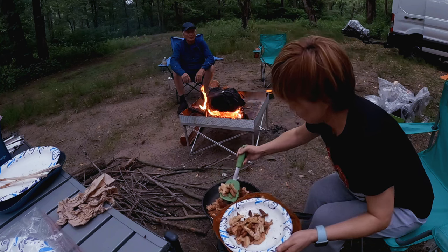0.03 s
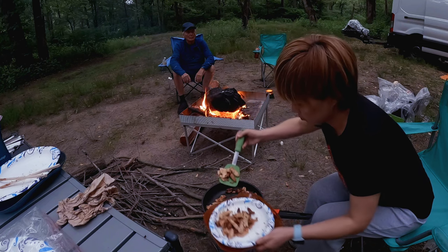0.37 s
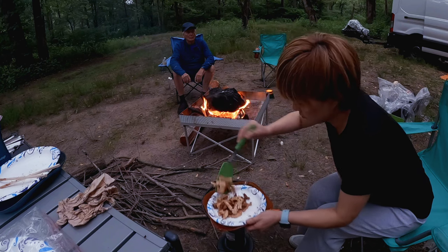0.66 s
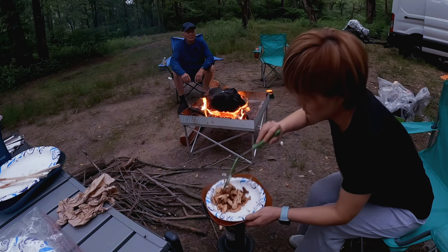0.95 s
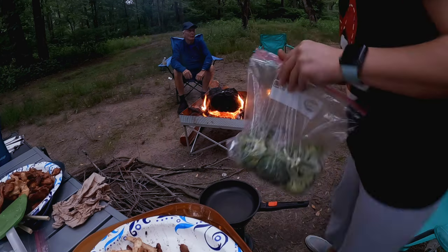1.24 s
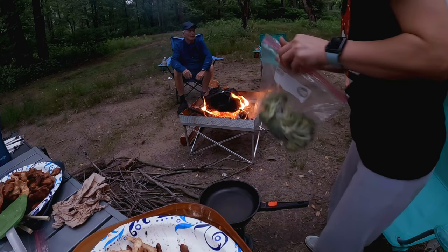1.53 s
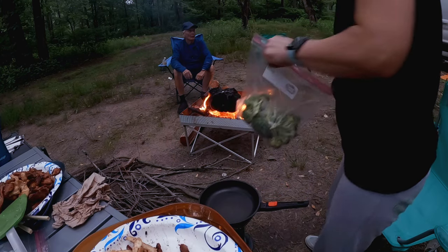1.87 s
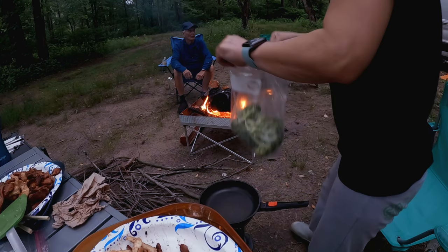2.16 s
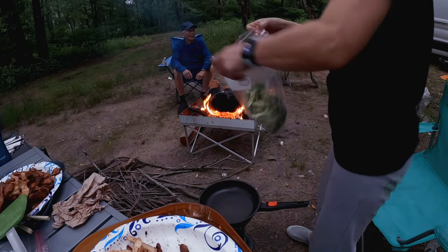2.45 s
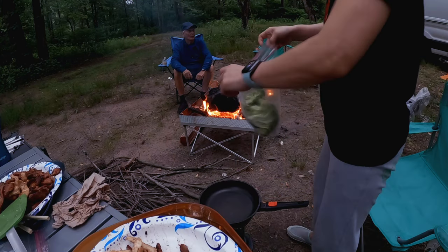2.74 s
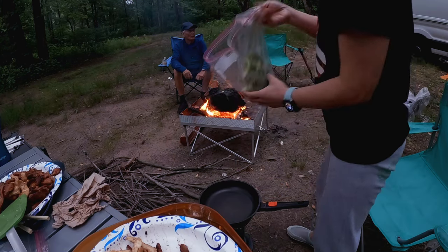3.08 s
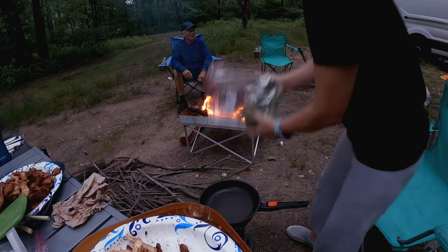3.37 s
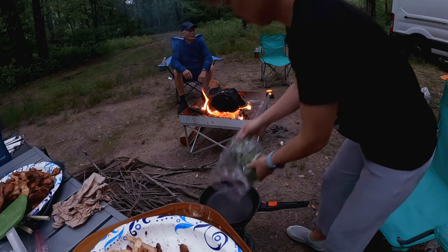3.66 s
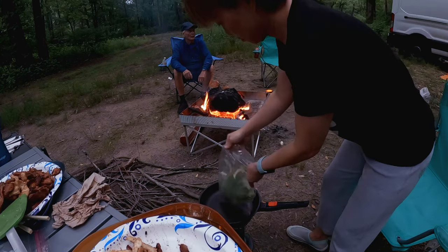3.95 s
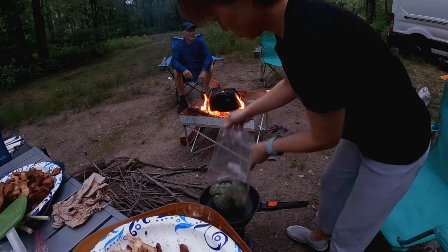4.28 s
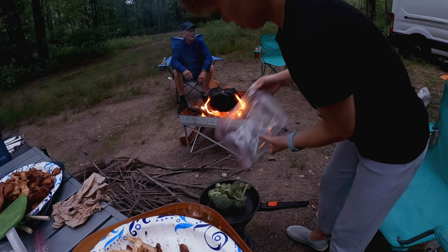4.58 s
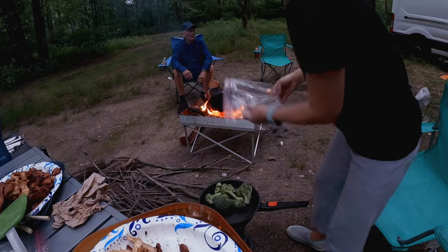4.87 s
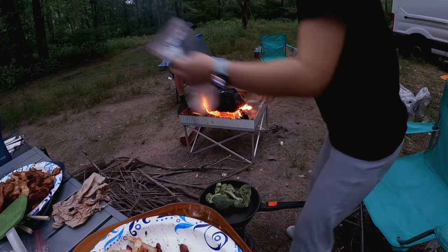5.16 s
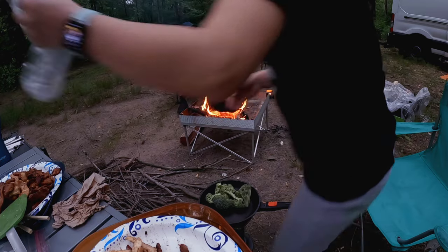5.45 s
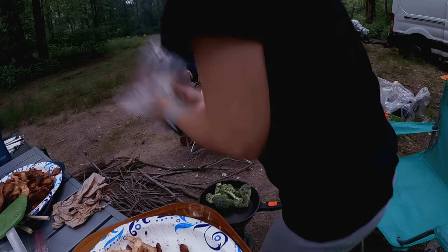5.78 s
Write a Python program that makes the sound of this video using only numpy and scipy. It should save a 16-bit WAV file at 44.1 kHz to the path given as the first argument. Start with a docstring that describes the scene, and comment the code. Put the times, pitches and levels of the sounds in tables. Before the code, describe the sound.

Over a softly whistling camp stove, frying stops, a zip bag is shaken and opened, and vegetables thud into a skillet and sizzle.

```python
"""A gas burner roars under a campsite skillet, and cavity resonances below the pan make its noise sing.
Steam bubbles bursting in hot fat give the sizzle of meat, which fades, then stops abruptly.
A plastic bag is shaken, unzipped and emptied, its film buckling in clicks; vegetables strike the pan,
exciting its modes, and the sizzle returns. Further off a wood fire ticks, and the swung bag sends
low puffs of air against the microphone."""
import sys
import numpy as np
from scipy import signal
from scipy.fft import rfft, irfft, next_fast_len
from scipy.io import wavfile
from scipy.ndimage import map_coordinates

SR = 44100
rng = np.random.default_rng(int(sys.argv[2]) if len(sys.argv) > 2 else 0)


def materialize(psi):
    """Save the field psi as 16-bit PCM at rate SR to the path in sys.argv[1].

    A 1-D psi becomes a single channel; in a 2-D psi each row is a channel.
    """
    bounded = np.clip(np.atleast_2d(psi).T, -1, 1)
    quanta = np.round(bounded * 32767).astype(np.int16)
    wavfile.write(sys.argv[1], SR, quanta)


N = 256662
TIME = np.arange(N) / SR

# envelope of the flame's singing band: t/s, level/dB
SONG_ENVELOPE = [(0, -46.6), (0.4, -51.9), (0.62, -49.3), (0.85, -41.7), (1.3, -36.1), (1.8, -37.6),
                 (2.22, -40.3), (2.45, -44.4), (3.0, -49.3), (3.48, -47.0), (3.7, -43.4), (4.2, -36.4),
                 (4.9, -40.7), (5.45, -45.3), (5.82, -45.0)]
# resonances of the cavity between burner and pan: f/Hz, half-width/Hz, level/dB
CAVITY_MODES = [(1284, 180, -10.5), (2266, 98, -2), (2448, 110, 1.5), (2800, 76, -13), (3550, 350, -21.5)]
# spectra of the roar, hot fat, crinkling film, dull handling, draught and eddies: f/Hz, level/dB
ROAR_SPECTRUM = [(20, -35), (50, -16), (110, -5.5), (175, 3.5), (250, -3), (420, -11), (640, -10.5),
                 (850, -12), (1300, -3.5), (2500, -8.5), (4500, -14), (6800, -22), (8500, -33.5),
                 (13000, -46), (16000, -57)]
FAT_SPECTRUM = [(300, -26), (900, -7), (1500, -3.5), (3000, -0.5), (4500, 0.5), (6800, -2.5), (8300, -12),
                (12500, -16), (15500, -33)]
FILM_SPECTRUM = [(80, -17), (600, -14.5), (1100, -4.5), (2000, -0.5), (3200, 2), (4800, -3), (6800, -8.5),
                 (8500, -22), (12500, -30.5), (15800, -48)]
HANDLING_SPECTRUM = [(25, -9), (80, 2), (250, 5), (600, 0.5), (1050, 3.5), (1800, -3), (4000, -52)]
DRAUGHT_SPECTRUM = [(15, 5), (35, -2), (80, -2.5), (150, -14), (400, -17.5), (1000, -42)]
EDDY_SPECTRUM = [(40, -5), (80, 1), (125, -11), (200, 4), (300, -10), (430, -12.5), (1100, -40.5)]
# drops of fat spitting: t/s, level/dB
FAT_SPITS = [(0.1378, -18), (0.242, -23), (0.3834, -24), (0.4614, -26), (0.602, -29), (0.72, -20),
             (0.9068, -26.5), (0.9884, -27), (1.284, -24), (4.4124, -18), (4.4188, -14), (4.6774, -20),
             (4.728, -15)]
# grips, tugs and shakes of the bag: peak t/s, crinkle level/dB, rub level/dB, rise/s, fall/s
BAG_GRIPS = [(1.952, -26, -28.5, .024, .02), (2.05, -33.5, -36, .075, .07), (2.143, -37, -33, .035, .018),
             (2.385, -38, -42, .04, .035), (2.5, -45, -57, .04, .08), (2.688, -33, -35.5, .085, .1),
             (2.832, -34.5, -31.5, .018, .042), (2.93, -46, -52, .06, .09), (3.087, -43, -42.5, .016, .018),
             (3.178, -32, -39.5, .047, .035), (3.31, -44, -50, .02, .02), (3.396, -37, -37.5, .035, .04),
             (3.55, -45, -52, .04, .025), (3.685, -40, -49, .025, .07), (3.82, -39, -45, .022, .2),
             (4.003, -33, -42, .018, .07), (4.09, -36, -37, .045, .07), (5.66, -48, -49, .08, .1),
             (5.82, -36, -58, .02, .03)]
# loud single creases buckling: t/s, level/dB, treble shelf/dB
LOUD_CREASES = [(1.918, -11.5, -10), (1.9225, -7.5, 4), (1.9423, -8, -8), (1.9468, -6, -4),
                (1.9519, -5, -10), (1.984, -14, 2), (1.9942, -10, -8), (2.0111, -11, 12), (2.0344, -11, -9),
                (2.0442, -8.5, 4), (2.0639, -7, 5), (2.0784, -17, 14), (2.117, -13, 3), (2.143, -10, 6),
                (2.2227, -21, 5), (2.5402, -17.5, -6), (2.592, -15, 7), (2.6438, -13.5, 14),
                (2.6603, -13, 16), (2.6907, -12, 20), (2.8513, -9, -5), (2.971, -23, 9), (3.0711, -23, 0),
                (3.0876, -21, 20), (3.111, -24, 0), (3.1934, -17, 22), (3.2256, -19, 18), (3.549, -17, 6),
                (3.6785, -18, 9), (3.7562, -21, 6), (3.8128, -17, -10), (3.902, -20, 14),
                (4.8177, -9.5, 15), (4.9842, -13.5, 18), (5.034, -13.5, -10), (5.1732, -17.5, 7),
                (5.5771, -13.5, 5), (5.635, -9.5, 32), (5.666, -10, 15), (5.7364, -12, 28)]
# the zip seal popping apart: t/s, level/dB, ring f/Hz
SEAL_POPS = [(2.3113, -11, 4250), (2.337, -7.5, 4270), (2.3418, -20, 3440), (2.353, -18, 4130),
             (2.3545, -12, 4100), (2.569, -11, 2750)]
# spectrum of the seal's crack: f/Hz, level/dB
SEAL_SPECTRUM = [(500, -17.5), (1600, -10), (3000, 0), (5200, -4.5), (8000, -21), (15000, -41)]
# vegetables landing: t/s, level/dB
VEG_LANDINGS = [(4.029, -24.5), (4.052, -29), (4.071, -39), (4.087, -25)]
# normal modes of the skillet: f/Hz, level/dB, T60/s
SKILLET_MODES = [(680, -13, 0.092), (783, -5, 0.21), (992, -6, 0.069), (1140, -10, 0.09), (1450, 1.5, 0.18),
                 (1868, -10, 0.17), (3050, -21, .13), (3500, -19, 0.15), (3820, -15, .11)]
# puffs from the swung bag: peak t/s, draught level/dB, eddy level/dB, rise/s, fall/s
AIR_PUFFS = [(4.753, -37, -24.5, .005, .022), (4.785, -27.5, -48, .015, .07), (5.25, -39.5, -65, .06, .25),
             (5.72, -46, -33, .012, .035)]
# burning wood popping: t/s, level/dB
WOOD_POPS = [(1.3618, -39), (1.5543, -26.5), (1.6132, -28), (1.7185, -33), (1.8097, -41), (1.8616, -31)]
# left-right likeness of the stove's noise: f/Hz, coherence
STOVE_COHERENCE = [(200, 0.97), (640, 0.84), (1400, 0.53), (3100, 0.43), (7000, 1), (15000, 0)]
# colour of the two microphone ports: f/Hz, left minus right level/dB
PORT_BALANCE = [(400, -0.1), (1200, 0), (2400, 1.5), (4400, -1.8), (8500, 0.5), (13000, -4.5)]


def burner():
    """Cavity resonance: the gap under the pan filters the flame's noise into a song above its roar."""
    def cavity_gain(hz):
        peaks = (amp(db) / (1 + ((hz - centre) / width) ** 2) for centre, width, db in CAVITY_MODES)
        return np.sqrt(sum(peak ** 2 for peak in peaks))

    roar = stereo_noise(lambda hz: amp(along(ROAR_SPECTRUM, hz))) * amp(-45 + 0.62 * wobble(11))
    rumble = stereo_noise(lambda hz: 1 / (1 + (hz / 80) ** 4)) * amp(-63 + 4 * wobble(14))
    # as the flame flutters, up to half the song's power locks into a trill of rising chirps
    locked = .5 * np.exp(-((TIME - 4.1) / .33) ** 2)
    chirps_per_s = 32
    cycle = (chirps_per_s * TIME + .07 * wobble(8)) % 1
    pitch_hz = 2400 + 420 * (cycle - .5) + 45 * wobble(120)
    trill = unit(np.sin(np.pi * cycle) ** 2 * np.sin(2 * np.pi * np.cumsum(pitch_hz) / SR))
    envelope = amp(np.interp(TIME, *np.transpose(SONG_ENVELOPE)) + 2.4)
    song = (np.sqrt(1 - locked) * stereo_noise(cavity_gain) + np.sqrt(locked) * trill) * envelope
    return roar + rumble + song * amp([[2.5], [-3.5]])  # the song lies to the left


def sizzle():
    """Boiling follows heat: crisp meat cools, duller wet vegetables warm and settle, and drops spit."""
    cooling_db_per_s, stop_s = 5.2, 1.305
    gate = np.clip((stop_s - TIME) / .01 + 1, 0, 1)
    meat = amp(-45.6 - cooling_db_per_s * TIME) * gate
    vegetables = amp(-43.7) * swell(peak_s=4.7, rise_s=.75, fall_s=3)
    spits = np.zeros(N)
    for s, db in FAT_SPITS:
        add(spits, s + .001, amp(db - 1.5) * click(FAT_SPECTRUM, t60=0.012, flutter=0.41))
    food = frying(meat, treble_db=2) + frying(vegetables, treble_db=-4.5)
    return food + scattered(spits, wet_db=-4, t60=.04)


def frying(heat, treble_db):
    """Shot noise: tiny steam bubbles burst independently in hot fat, over a fine hiss."""
    spectrum = treble_shelf(FAT_SPECTRUM, treble_db)
    bubbles = crackle(spectrum, per_s=900, spread_db=10, t60=0.0012) * heat * amp(2.5)
    hiss = stereo_noise(lambda hz: amp(along(spectrum, hz))) * heat * amp(0.5)
    return scattered(bubbles, wet_db=-3, t60=0.047) + hiss


def bag():
    """Buckling: plastic film snaps in swarms of creases and single loud ones, over its load's dull rub."""
    crinkle, rub = swells(BAG_GRIPS)
    film = crackle(FILM_SPECTRUM, per_s=2000, spread_db=5, t60=0.0074, shapes=24) * crinkle * amp(1.5)
    film += crackle(HANDLING_SPECTRUM, per_s=2500, spread_db=4.5, t60=0.0064) * rub * amp(0.3)
    creases = crackle(FAT_SPECTRUM, per_s=160, spread_db=4, t60=0.005) * crinkle * amp(-6.5)
    for s, db, treble_db in LOUD_CREASES:
        spectrum = treble_shelf(FILM_SPECTRUM, treble_db)  # a tighter crease is brighter
        # under heavy strain one crease sets off its neighbours, lengthening the click
        strain = min(rub[round(s * SR)] / amp(-38), 1)
        crease = click(spectrum, t60=0.006 + 0.004 * strain, flutter=1.75 + 2 * strain)
        add(creases, s + 0.001034, amp(db) * crease)
    return scattered(film, wet_db=-3, t60=0.015) + scattered(creases, wet_db=-8, t60=0.057)


def zip_seal():
    """Damped free vibration: the stiff seal lets go in cracks, each ringing briefly at one frequency."""
    pops, t = np.zeros(N), np.arange(1024) / SR
    for s, db, hz in SEAL_POPS:
        crack = click(SEAL_SPECTRUM, t60=0.01, flutter=3.3)
        ring = np.sin(2 * np.pi * hz * t) * decay(t, t60=0.0086) * onset(t, tau_s=0.00047)
        add(pops, s, amp(db) * (1.35 * ring + 1.21 * crack))
    return scattered(pops, wet_db=-9.5, t60=0.11)


def skillet():
    """Impact excitation: soft pieces thud into the pan and set its normal modes ringing."""
    knocks, t = np.zeros(N), np.arange(SR // 2) / SR
    for s, db in VEG_LANDINGS:
        ring = sum(amp(level) * decay(t, t60) * np.sin(2 * np.pi * (hz * t + rng.random()))
                   for hz, level, t60 in SKILLET_MODES)
        thud = coloured(rng.standard_normal(len(t)), HANDLING_SPECTRUM) * amp(-3) * decay(t, t60=0.067)
        add(knocks, s, amp(db) * (ring + thud) * onset(t, tau_s=0.001))
    return scattered(knocks, wet_db=-15, t60=.04)


def air_puffs():
    """Wind noise: the moving bag drives a slow draught and sharper eddies over the microphone."""
    push, flap = swells(AIR_PUFFS)
    _, rub = swells(BAG_GRIPS)
    stir = amp(-11) * rub  # working the bag also moves a little air
    draught = unit(filtered(rng.standard_normal(N), lambda hz: amp(along(DRAUGHT_SPECTRUM, hz))))
    eddies = unit(filtered(rng.standard_normal(N), lambda hz: amp(along(EDDY_SPECTRUM, hz))))
    return draught * (push + stir) + eddies * flap


def wood_fire():
    """Impulsive emission: burning wood ticks softly at random and now and then pops."""
    ticks = crackle(FILM_SPECTRUM, per_s=37, spread_db=3.5, t60=0.0062) * amp(-52)
    for s, db in WOOD_POPS:
        add(ticks, s + 0.00104, amp(db) * click(FAT_SPECTRUM, t60=0.0098, flutter=1.5))
    return scattered(ticks, wet_db=-8, t60=.04)


def scattered(x, wet_db, t60, size=2048):
    """Scattering: table and ground add a short diffuse stereo tail to the direct sound."""
    t = np.arange(size) / SR
    blocks = np.pad(x, (0, -N % size)).reshape(-1, size)
    # the tail is drawn afresh for each block so that it has no steady pitch
    tails = rng.standard_normal((2, len(blocks), size)) * decay(t, t60) * onset(t, tau_s=0.00023)
    tails /= np.linalg.norm(tails, axis=2, keepdims=True)
    echo = irfft(rfft(blocks, 2 * size) * rfft(tails, 2 * size))
    within_block = echo[..., :size].reshape(2, -1)
    spill_over = np.pad(echo[..., size:].reshape(2, -1), ((0, 0), (size, 0)))
    wet = within_block[:, :N] + spill_over[:, :N]
    return x + amp(wet_db) * filtered(wet, lambda hz: hz / np.hypot(hz, 1200))


def stereo_noise(response):
    """Partial coherence: mid and side noise mix to set the left-right likeness by frequency; rms 1."""
    def mid_side_gain(hz):
        angle = np.arccos(np.clip(along(STOVE_COHERENCE, hz), -1, 1)) / 2
        return response(hz) * [np.cos(angle), np.sin(angle)]

    mid, side = filtered(rng.standard_normal((2, N)), mid_side_gain)
    return unit(np.array([mid + side, mid - side]))


def snap(t60, flutter, size=1024):
    """Sudden release: a unit impulse, then a random shiver of energy near flutter squared."""
    shiver = rng.standard_normal(size) * decay(np.arange(size) / SR, t60)
    shiver *= flutter / np.linalg.norm(shiver)
    shiver[0] = 1
    return shiver


def click(spectrum, t60, flutter):
    """Source and filter: one coloured snap of either sign and constant energy."""
    sound = coloured(snap(t60, flutter), spectrum)
    return sound * rng.choice([-1, 1]) * 3 / np.linalg.norm(sound)


def crackle(spectrum, per_s, spread_db, t60, shapes=12):
    """Poisson process: coloured snaps of uneven size and shape at random times; rms 1."""
    snaps = np.zeros(N)
    for _ in range(shapes):
        sizes = amp(spread_db * np.minimum(rng.standard_normal(N), 2)) * rng.choice([-1, 1], N)
        occurs = rng.random(N) < per_s / shapes / SR
        snaps += signal.oaconvolve(sizes * occurs, snap(t60, flutter=1.17))[:N]
    return unit(coloured(snaps, spectrum))


def swell(peak_s, rise_s, fall_s):
    """Growth and decay: a gain of 1 at the peak, 10 dB lower rise_s before and fall_s after."""
    before, after = np.maximum(peak_s - TIME, 0), np.maximum(TIME - peak_s, 0)
    return amp(-10 * np.minimum((before / rise_s) ** 1.7 + after / fall_s, 20))


def swells(rows):
    """Incoherent addition: swells sum in power, giving one gain curve for each level column."""
    powers = (np.outer(amp(levels), swell(s, rise, fall)) ** 2 for s, *levels, rise, fall in rows)
    return np.sqrt(sum(powers))


def decay(t, t60):
    """Exponential damping by 60 dB in t60 seconds."""
    return amp(-60 * t / t60)


def onset(t, tau_s):
    """First-order rise from 0 towards 1."""
    return 1 - np.exp(-t / tau_s)


def wobble(knots_per_s):
    """Random modulation: a smooth curve through Gaussian knots."""
    return map_coordinates(rng.standard_normal(int(N * knots_per_s / SR) + 4), [TIME * knots_per_s])


def coloured(x, spectrum, size=1024):
    """Minimum-phase filtering: causal, so clicks keep their sharp fronts."""
    cepstrum = irfft(np.log(amp(along(spectrum, np.fft.rfftfreq(size, 1 / SR)))))
    cepstrum[1:size // 2] *= 2
    cepstrum[size // 2 + 1:] = 0
    return signal.fftconvolve(x, irfft(np.exp(rfft(cepstrum))))[:len(x)]


def filtered(x, response):
    """Linear filtering: the spectrum of x times a frequency response."""
    size = next_fast_len(N + 8192)
    return irfft(rfft(x, size) * response(np.fft.rfftfreq(size, 1 / SR)), size)[..., :N]


def treble_shelf(spectrum, treble_db):
    """Shelving: a spectrum's treble is shifted, by half of treble_db at 7 kHz."""
    return [(hz, db + treble_db * hz ** 2 / (hz ** 2 + 7000 ** 2)) for hz, db in spectrum]


def along(points, hz):
    """Interpolation of (f/Hz, value) points on a logarithmic frequency axis."""
    frequencies, values = np.transpose(points)
    return np.interp(np.log(hz + 1), np.log(frequencies + 1), values)


def amp(db):
    """Amplitude ratio of a level in decibels."""
    return 10 ** (np.asarray(db) / 20)


def unit(x):
    """Normalisation to rms 1."""
    return x / np.sqrt(np.mean(x ** 2) + 1e-20)


def add(track, s, sound):
    """Superposition of a sound on a track at time s."""
    part = track[max(round(s * SR), 0):][:len(sound)]
    part += sound[:len(part)]


def scene():
    """Superposition of stove, pan, bag and fire in the open air."""
    return burner() + sizzle() + bag() + zip_seal() + skillet() + wood_fire() + air_puffs()


def record(dry):
    """Spaced receivers: two close, band-limited ports of unlike colour, the right one reached first."""
    lag_s, top_hz = 3.2e-5, 15850
    side = np.array([[.5], [-.5]])

    def port_response(hz):
        delay = np.exp(-2j * np.pi * hz * lag_s * side)
        return amp(side * along(PORT_BALANCE, hz)) * delay * (hz < top_hz)

    return filtered(dry, port_response)


dry = scene()
out = record(dry)
materialize(out)
```